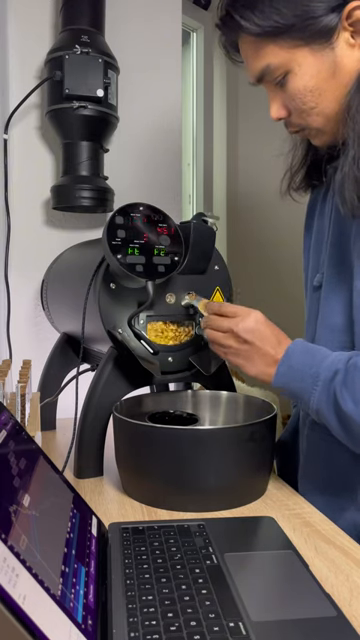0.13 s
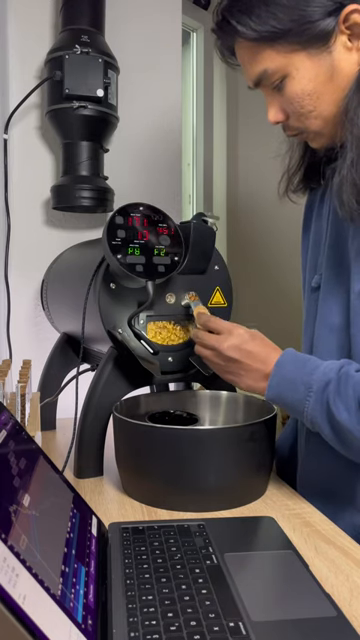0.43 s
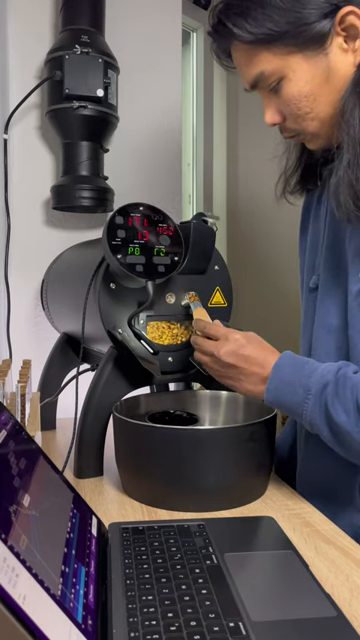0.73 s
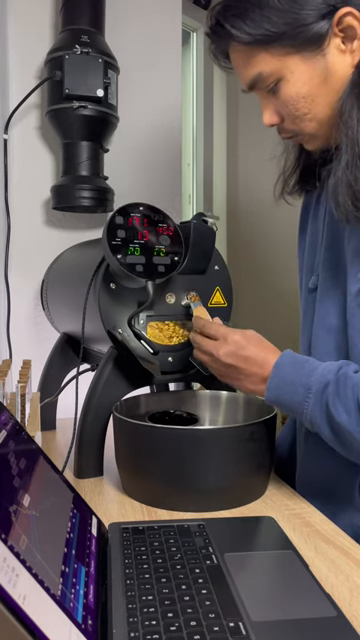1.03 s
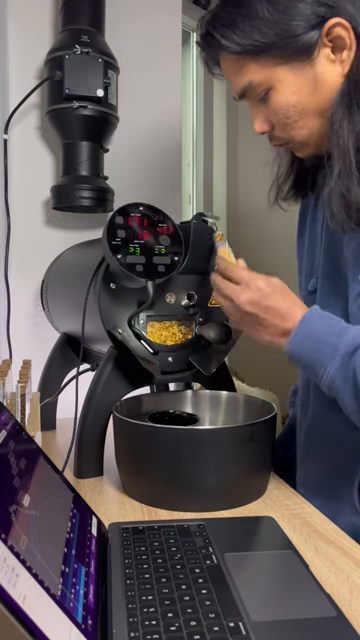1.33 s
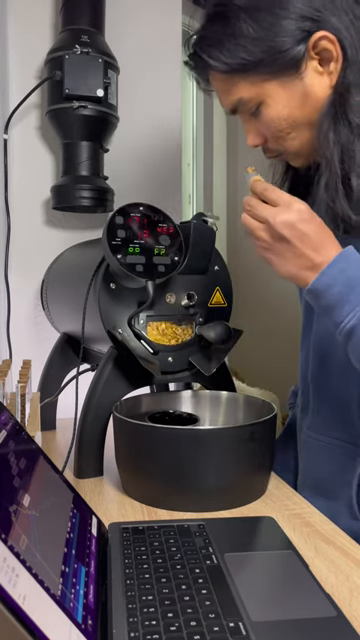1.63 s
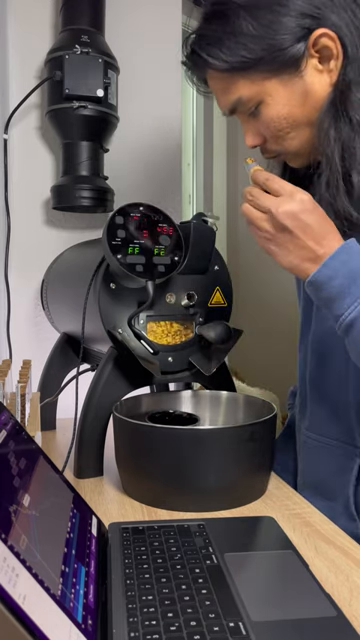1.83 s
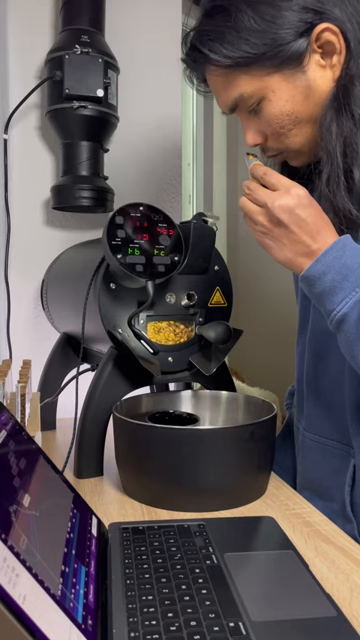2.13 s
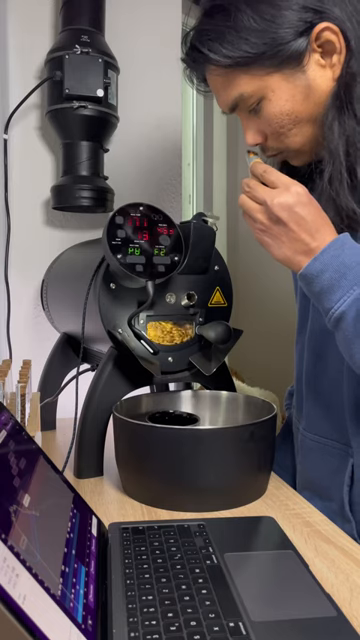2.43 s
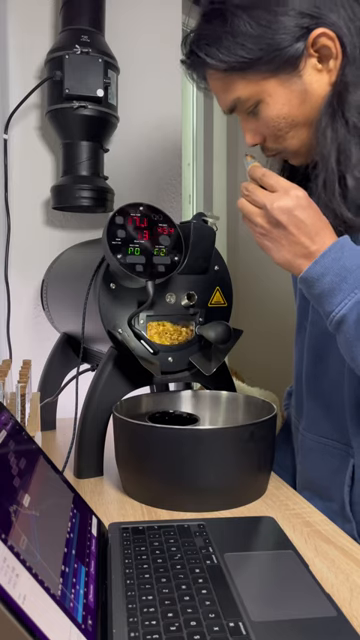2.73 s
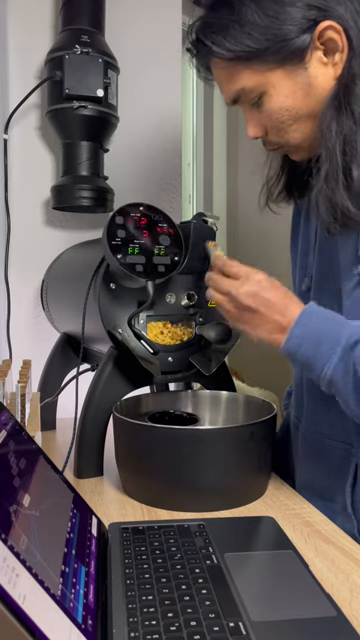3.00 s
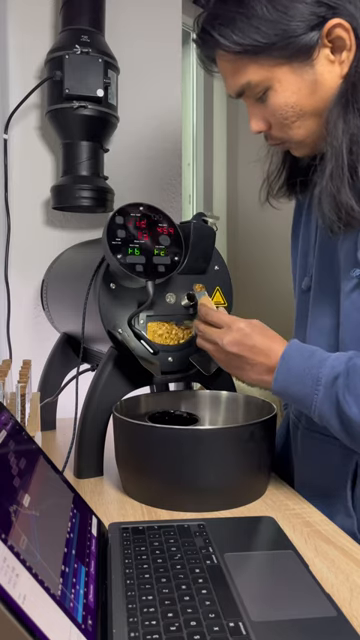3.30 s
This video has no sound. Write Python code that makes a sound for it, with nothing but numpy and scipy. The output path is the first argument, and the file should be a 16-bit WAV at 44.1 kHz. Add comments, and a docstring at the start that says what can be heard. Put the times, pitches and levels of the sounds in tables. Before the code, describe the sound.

Dense, bright rattle of coffee beans swelling with each turn of a metal drum, never stopping, above a steady airy fan and wavering motor whine; close phone stereo pickup in a room, already running at the start.

```python
"""Indoors, on a desk, a small coffee roaster runs about a metre from a phone with two microphone ports.
Each vane of the turning drum lifts beans and drops them: random impulses, filtered into a dense rattle,
also drive the narrow modes of the steel drum, while other beans keep rolling between drops.
The fan is shaped noise with case and duct resonances and a deep rumble that rises, then sinks;
its blades and the motor sound as sines that waver in pitch and level."""
import sys
import numpy as np
from scipy import signal
from scipy.fft import rfft, irfft, next_fast_len
from scipy.io import wavfile
from scipy.ndimage import uniform_filter1d

SR = 44100
rng = np.random.default_rng(int(sys.argv[2]) if len(sys.argv) > 2 else 0)


def log_audio(samples):
    """Write samples as a 16-bit WAV file to the path given in sys.argv[1]."""
    # one column per channel
    frames = np.atleast_2d(samples).T
    # limit to full scale, then quantise
    limited = np.clip(frames, -1, 1)
    pcm = np.round(limited * 32767).astype(np.int16)
    wavfile.write(sys.argv[1], SR, pcm)


N = 152586
SIZE = next_fast_len(N + SR // 2)  # half a second of padding lets resonances die out
HZ = np.arange(SIZE // 2 + 1) * SR / SIZE  # frequency of each spectral bin
SIDE = np.array([[.5], [-.5]])  # splits a left-minus-right difference equally between the ports


def undb(db):
    """Decibel law: a level in dB becomes an amplitude ratio."""
    return 10 ** (np.asarray(db) / 20)


def along(table, column=1):
    """Interpolation over log frequency: reads a table column at every spectral bin."""
    table = np.array(table, float)
    return np.interp(np.log(HZ + 1), np.log(table[:, 0]), table[:, column])


def coloured(x, table):
    """Linear filtering: gives unit-power white x a spectral density in dB per Hz."""
    return rfft(x, SIZE) * undb(along(table)) * np.sqrt(SR / 2)


def resonance(hz, width, db):
    """Single-pole resonance: the response of one mode, scaled for a unit-power drive."""
    unit_gain = np.sqrt(SR / np.pi / width)
    bass_slope = np.minimum(HZ / hz, 1)
    return undb(db) * unit_gain * bass_slope / (1 + 2j * (HZ - hz) / width)


def ringing(x, hz, width, db):
    """Forced vibration: the spectrum of one resonance driven by unit-power x."""
    return rfft(x, SIZE) * resonance(hz, width, db)


def walk(rate):
    """Low-pass noise: twice-averaged white noise makes a smooth wander of spread 1."""
    k = int(SR / rate)
    wander = uniform_filter1d(uniform_filter1d(rng.standard_normal(N), k), k)
    return (wander - wander.mean()) / wander.std()


def rattle(flow):
    """Shot noise: clumped impacts of unit power, signed independently for a common and a scattered part."""
    impacts_per_s = 9000  # in each stream
    size_db = 2.2  # mean of the exponential spread of impact levels
    clump_db, clumps_per_s = 1.9, 25
    struck = rng.random(N) < impacts_per_s / SR
    sizes = undb(size_db * rng.exponential(size=N))
    signs = 2 * rng.integers(0, 2, size=(2, N)) - 1  # rows: common part, scattered part
    hits = struck * sizes * signs
    hits = hits * np.sqrt(flow) * undb(clump_db * walk(clumps_per_s))
    return hits / np.sqrt(np.mean(hits ** 2))


def bean_flow(t):
    """Power addition: the impact power of rolling beans plus a rise, hold and decay for each drop."""
    # beans that keep rolling between drops (time [s], relative level [dB])
    rolling = [(0, 0.5), (.19, -1), (.44, -3.5), (.7, -0.5), (.95, -1.5), (1.2, -0.5), (1.46, -2),
               (1.73, -1.5), (1.98, -1), (2.22, -1.5), (2.5, -1), (2.76, -1.5), (2.97, -1.5), (3.22, -0.6),
               (3.46, 0)]
    # beans dropped by the vanes (start [s], relative level [dB], hold [s])
    drops = [(-.05, 2, 0.029), (0.203, -1, 0.085), (0.35, -2.5, 0.0042), (0.447, 0, 0.069), (.6, -9, .005),
             (0.715, 0, 0.076), (0.979, 0.5, 0.057), (1.233, -1, 0.084), (1.493, 1.5, 0.041),
             (1.663, -11.5, 0.0056), (1.752, -0.5, .06), (2.003, -1, 0.061), (2.244, -1.5, 0.12),
             (2.404, -9, 0.0075), (2.522, -0.5, 0.038), (2.78, 0.5, 0.034), (3.025, -0.5, 0.068),
             (3.263, -1.5, 0.071), (3.326, -2, 0.0052)]
    rise_s, fall_s = 0.031, 0.042  # fall_s is the time constant of the power
    flow = undb(2 * np.interp(t, *np.array(rolling).T))  # doubled dB turn amplitude into power
    for start, db, hold in drops:
        late = np.maximum(t - start, 0)
        rise = np.clip(late / rise_s, 0, 1) ** 2
        fall = np.exp(-np.maximum(late - rise_s - hold, 0) / fall_s)
        flow = flow + undb(2 * db) * rise * fall
    return flow


def beans(t):
    """Superposition of contacts: lighter ones click higher and follow the drops more strongly."""
    # kinds of bean contact, heavy to light (centre frequency [Hz])
    kinds_hz = [2200, 3000, 4000, 5200, 6500, 8000, 9500, 11000, 12500]
    # click spectrum of the beans (frequency [Hz], density [dB per Hz])
    click = [(900, -95), (2000, -80), (2800, -78), (3150, -81), (3400, -78), (3570, -82), (4200, -78),
             (5000, -78), (5400, -81), (6100, -76), (6630, -75), (7100, -72), (7600, -74), (8100, -79),
             (8450, -75), (8900, -80), (9250, -84), (9500, -81), (9750, -83), (10000, -81), (10250, -83),
             (10800, -79.5), (11600, -82), (12700, -83), (13150, -89), (13800, -93)]
    flow = bean_flow(t)
    swells = np.linspace(1, 1.6, len(kinds_hz))  # exponents on the flow, lowest to highest clicks
    clicks = 0
    for kind, swell in zip(np.eye(len(kinds_hz)), swells):
        band = np.sqrt(np.interp(HZ, kinds_hz, kind))  # the bands overlap to constant total power
        clicks = clicks + coloured(rattle(flow ** swell), click) * band
    return clicks + drum(flow)


def drum(flow):
    """Modal excitation: beans landing on each spot of the wall ring their own share of the modes."""
    # steel drum modes (frequency [Hz])
    modes_hz = [2385, 2520, 2620, 2947, 3080, 3330, 3448, 3830, 4110, 4230, 4520, 4845, 5100, 5292, 5690,
                5850, 6000, 6200, 6330, 6530, 6770, 6960, 7265, 7400, 7580, 7720, 7985, 8230, 8360]
    # ringing of those modes, in the same order (width [Hz], rms level [dB])
    rings = [(30, -52), (30, -53.5), (40, -58), (25, -55.5), (17.1, -52.5), (80, -51), (25, -53), (60, -52),
             (91, -50), (40, -60), (80, -51), (45, -50.5), (30, -61.5), (30, -56), (50, -49), (60, -45.5),
             (60, -52.5), (60, -48), (70, -46.5), (70, -44.5), (70, -45.5), (110, -41), (60, -47),
             (90, -50.5), (40, -58), (40, -57.5), (40, -53.5), (60, -65), (50, -65)]
    spots = 8  # places on the wall where beans land
    modes = [(hz, *ring) for hz, ring in zip(modes_hz, rings)]
    out = 0
    for spot in range(spots):
        response = sum(resonance(*mode) for mode in modes[spot::spots])
        out = out + rfft(rattle(flow), SIZE) * response
    return out


def air():
    """Diffuse noise: white noise twice over, one part common to the ports, one scattered by the room."""
    return rng.standard_normal((2, N))


def fan(t):
    """Flow noise: broad air noise, the resonances it stirs and a deep rumble."""
    # air of the fan (frequency [Hz], density [dB per Hz])
    air_spectrum = [(25, -110), (45, -98), (62, -63), (80, -76), (93, -79), (104, -64), (135, -64),
                    (147, -72), (165, -68), (250, -67), (298, -68), (345, -68), (400, -71), (480, -66),
                    (580, -68), (680, -66.5), (770, -70.5), (850, -65.5), (930, -71.5), (1000, -66.5),
                    (1070, -73.5), (1400, -72.5), (1530, -77), (1700, -73.5), (2500, -76), (5000, -93),
                    (9000, -100)]
    # case and duct resonances stirred by the fan (frequency [Hz], width [Hz], rms level [dB])
    case_modes = [(262, 14, -53.5), (277.6, 14.3, -48.5), (319.8, 5.7, -53.5), (698, 37, -48.5),
                  (949, 7.9, -49.5), (1628, 30, -50.5)]
    # drive of the deep rumble, ahead of its filter (time [s], rms level [dB])
    rumble_drive = [(0, -55), (.55, -51), (1.1, -54), (1.6, -55), (2.3, -61), (3.46, -70)]
    rumble_hz, rumble_width_hz = 46, 13  # the width of each of two equal poles
    broad = coloured(air(), air_spectrum)
    drive = air() * undb(np.interp(t, *np.array(rumble_drive).T))
    second_pole = 1 / (1 + 2j * (HZ - rumble_hz) / rumble_width_hz)
    rumble = ringing(drive, rumble_hz, rumble_width_hz, 0) * second_pole
    return broad + rumble + sum(ringing(air(), *mode) for mode in case_modes)


def tones(t):
    """Frequency and amplitude modulation: blade and motor sines waver in pitch and level."""
    # tones of the fan blades and motor (frequency [Hz])
    tones_hz = [58.3, 520, 558.2, 723.1, 965.5, 1116, 1275.5, 1809, 1868.2, 1938.5]
    # each tone in the same order (rms level [dB], pitch waver [Hz], level waver [dB],
    # left minus right [dB], phase by which left leads [rad])
    settings = [(-58, 0.5, 2, -.5, 0), (-47, 2.56, 3, -5, 1.26), (-39, 0.38, 1.14, 4, 0.33),
                (-50, .6, 0.5, -1, 0.1), (-49, 1.41, 6.5, -0.5, 1.47), (-58, 3, 0.5, 9, 1),
                (-62.5, 0.69, -4, 3.5, 2), (-55.5, 2.8, 4.5, 2.5, 0.2), (-54, 2.57, -2.5, -3, 0.6),
                (-58, 1.9, 1, 0, -2)]
    hum_fade_db_per_s = -3.5  # the lowest tone sinks slowly
    out = 0
    for hz, (db, waver_hz, waver_db, pan_db, lead) in zip(tones_hz, settings):
        phase = 2 * np.pi * np.cumsum(hz + waver_hz * walk(4.5)) / SR
        level_db = db + waver_db * walk(11)
        if hz == tones_hz[0]:
            level_db = level_db + hum_fade_db_per_s * t
        sine = np.sqrt(2) * np.sin(phase + lead * SIDE)  # unit rms
        out = out + undb(level_db + pan_db * SIDE) * sine
    return out


def ports(spectra):
    """Partial coherence: the common part differs in phase at the ports; the scattered part unlikens them."""
    # the two ports (frequency [Hz], phase by which left leads [rad], likeness [0-1],
    # left minus right [dB])
    port_pairs = [(50, 0, .999, -.1), (85, .01, .995, -.8), (120, .02, .99, -1.5), (280, .08, .98, -2),
                  (500, .5, .9, -1), (750, .9, .7, 0), (1050, 0, .4, 1.5), (1350, .4, .7, 1),
                  (1800, .15, .88, .5), (2300, .5, .65, .5), (2800, .9, .3, 0), (3500, 1.7, .35, 0),
                  (4100, .7, .72, 0), (4800, 2, .2, 0), (5250, 0, .97, .5), (6000, .45, .9, 0),
                  (7000, 1.35, .9, -.5), (8000, 2.2, .75, 0), (8600, 2.85, .95, 0), (11650, 3.5, .95, 0),
                  (11900, 4.1, .65, 0), (12600, 4.7, .55, 0), (13200, 6.28, .97, 0)]
    opposed_hz = 8950, 11500  # the phase lead is half a cycle here
    knots = sorted(port_pairs + [(hz, np.pi, 1, 0) for hz in opposed_hz])
    lead = along(knots, column=1)
    alike = np.clip(along(knots, column=2), 0, 1)
    pan_db = along(knots, column=3)
    common = np.sqrt((1 + alike) / 2) * spectra[0]
    scattered = np.sqrt((1 - alike) / 2) * spectra[1] * 2 * SIDE  # opposite signs at the ports
    heard = (common + scattered) * np.exp(1j * lead * SIDE) * undb(pan_db * SIDE)
    return irfft(heard, SIZE)[:, :N]


def scene():
    """Superposition: beans and fan reach both ports, and the tones add to them."""
    t = np.arange(N) / SR
    return ports(beans(t) + fan(t)) + tones(t)


def record(dry):
    """Band limiting: the phone thins the deep bass and cuts the top."""
    low_cut_hz, top_hz = 30, 13800
    thin = signal.sosfilt(signal.butter(2, low_cut_hz, "high", fs=SR, output="sos"), dry)
    # 0.2 dB of passband ripple, 70 dB of stopband loss
    return signal.sosfilt(signal.ellip(14, .2, 70, top_hz, fs=SR, output="sos"), thin)


dry = scene()
out = record(dry)
log_audio(out)
```